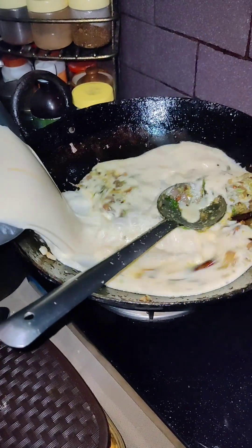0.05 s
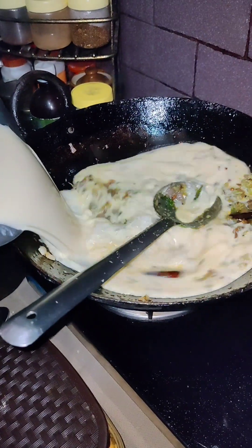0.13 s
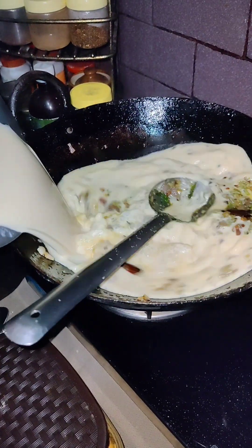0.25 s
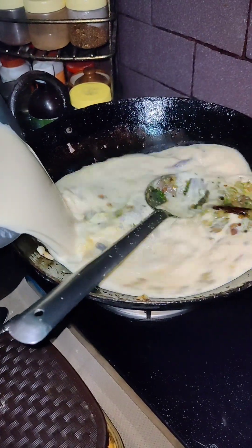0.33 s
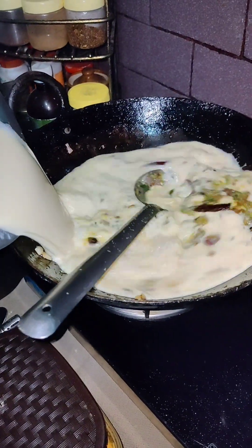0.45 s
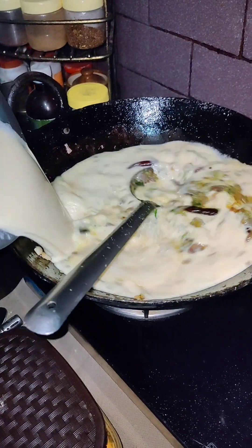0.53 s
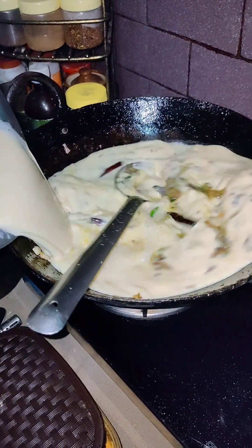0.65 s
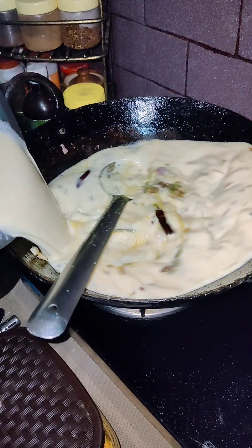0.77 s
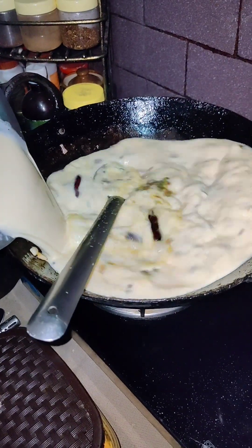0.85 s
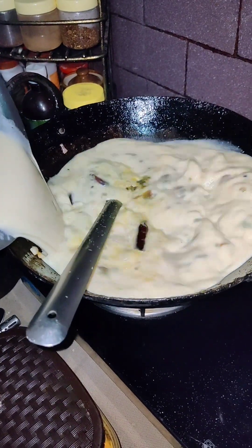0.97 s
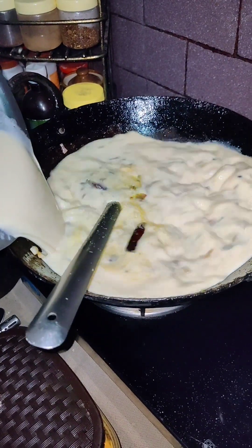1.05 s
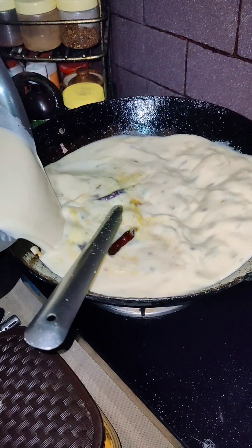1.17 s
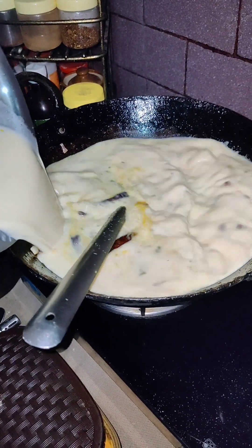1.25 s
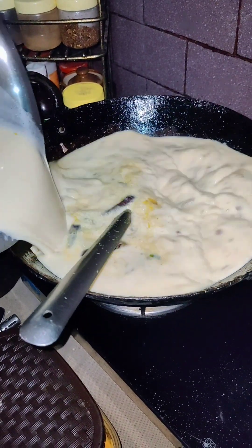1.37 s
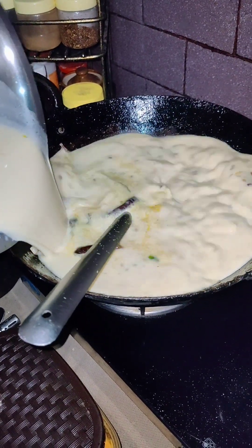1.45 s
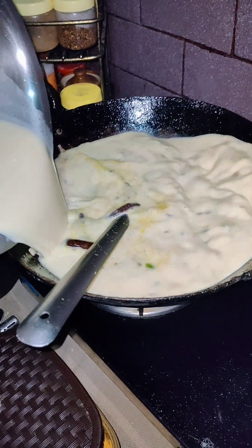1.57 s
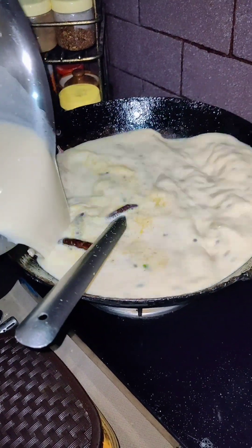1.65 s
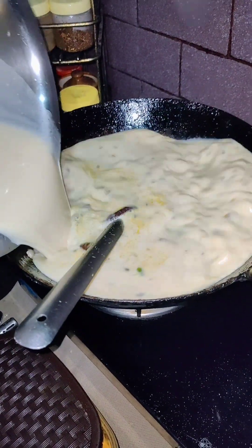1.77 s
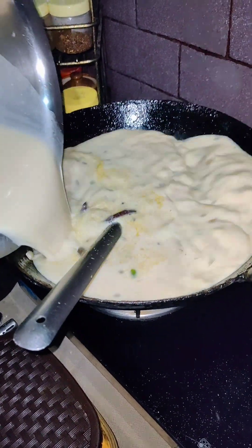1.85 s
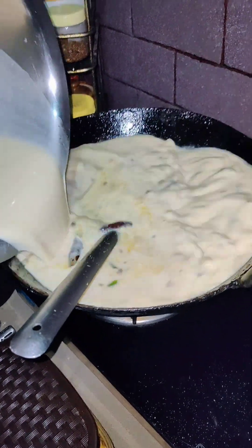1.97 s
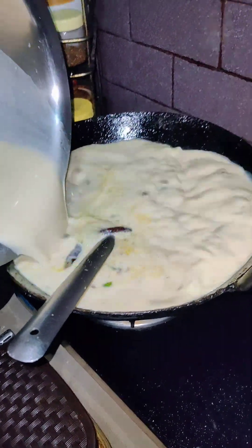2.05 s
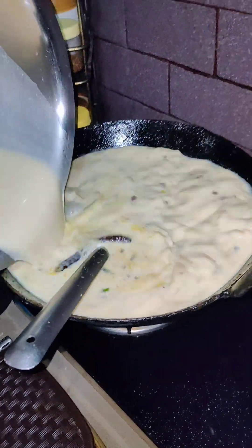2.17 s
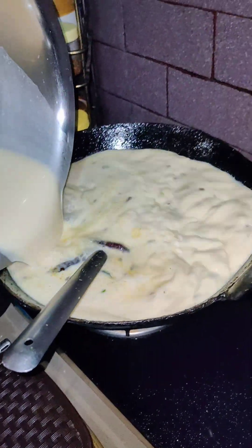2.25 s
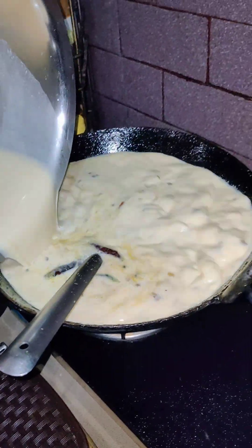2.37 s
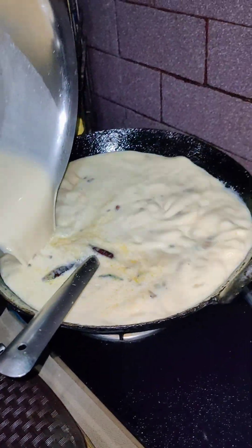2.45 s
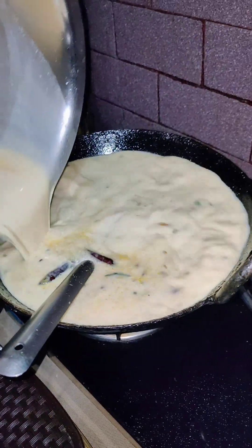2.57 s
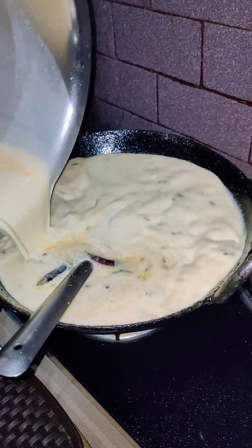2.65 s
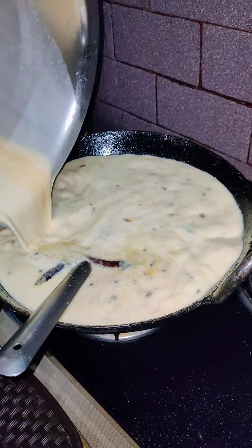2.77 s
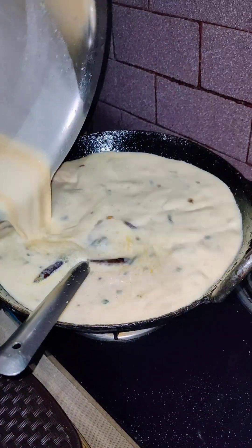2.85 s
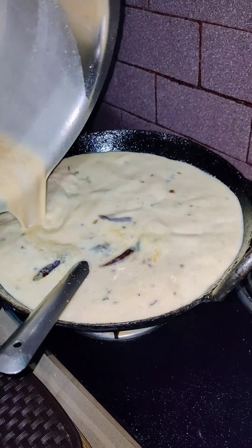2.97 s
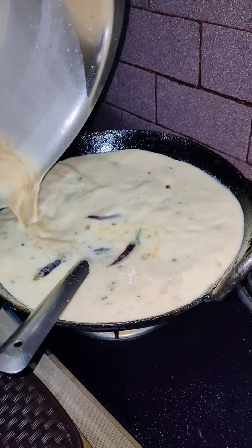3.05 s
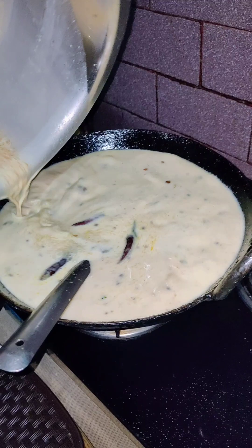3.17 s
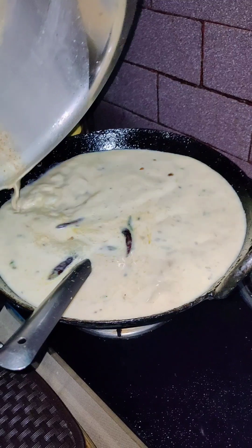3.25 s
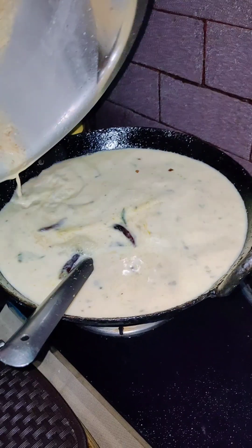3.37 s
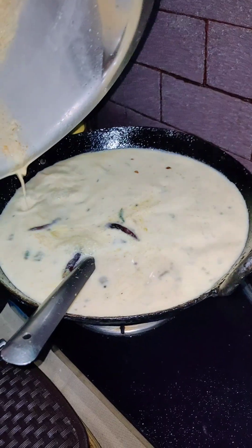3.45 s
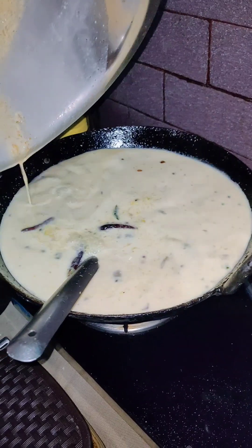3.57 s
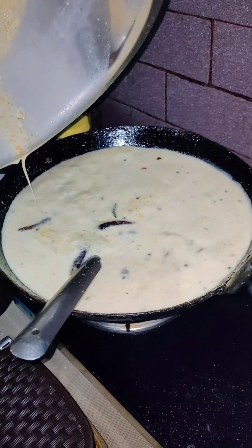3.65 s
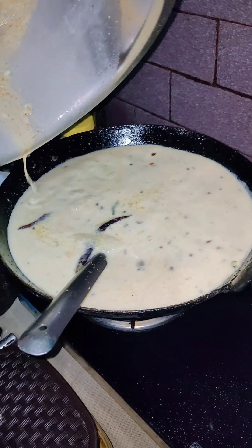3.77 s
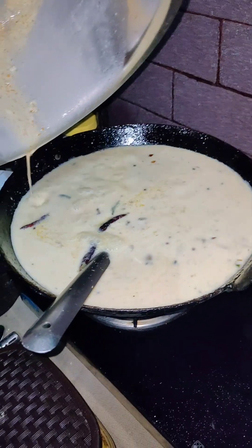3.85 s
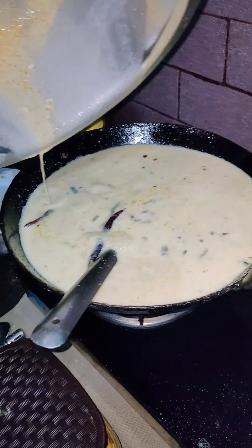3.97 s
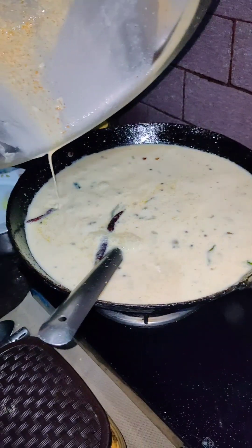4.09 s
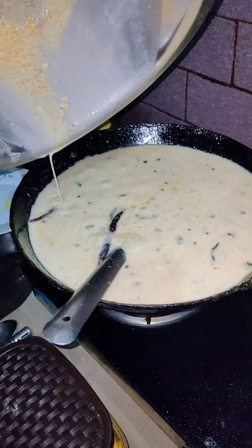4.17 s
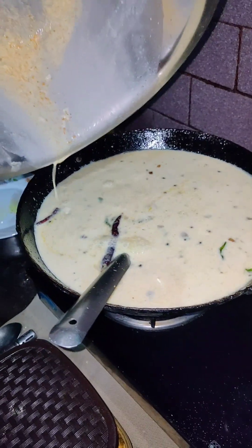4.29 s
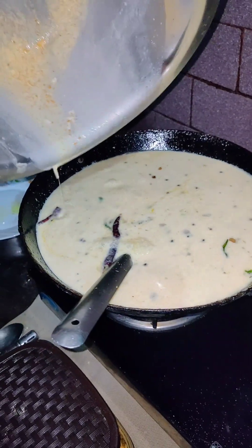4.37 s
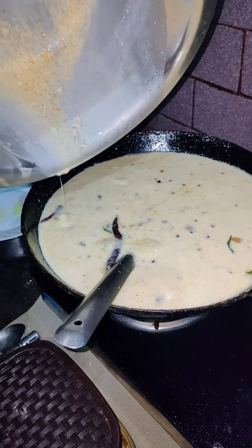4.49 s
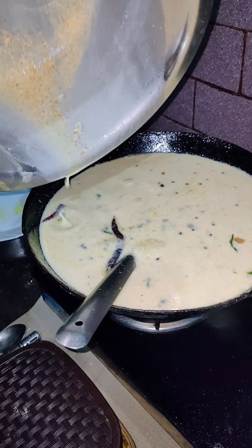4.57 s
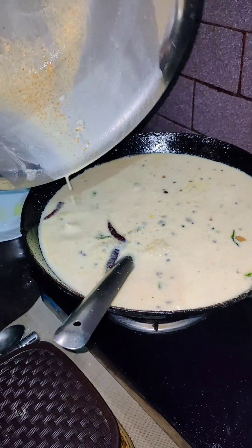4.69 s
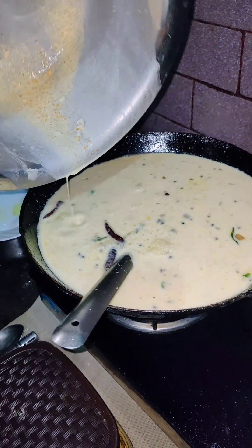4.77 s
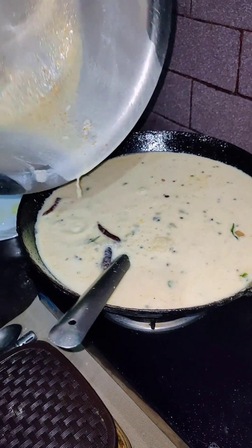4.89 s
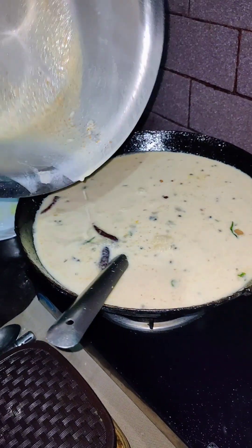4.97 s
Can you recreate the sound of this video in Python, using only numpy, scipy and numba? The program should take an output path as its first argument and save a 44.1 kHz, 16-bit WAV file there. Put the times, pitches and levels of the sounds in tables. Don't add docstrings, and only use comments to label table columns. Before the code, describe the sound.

Liquid batter is poured into a hot deep pan: a loud, dense wet sizzle with low bubbling glugs, softening steadily over three seconds. Soft metal knocks of ladle and pan occur midway, then a brief cluster of plops, and finally thin high fizz with ticking drops. Small tiled kitchen with a faint motor hum, close phone stereo.

```python
import sys
import numpy as np
from scipy import signal
from scipy.fft import rfft, irfft, next_fast_len
from scipy.io import wavfile
from scipy.ndimage import uniform_filter1d, map_coordinates
from numba import njit

SR = 44100
rng = np.random.default_rng(int(sys.argv[2]) if len(sys.argv) > 2 else 0)


def undo_db(level):
    steps = np.asarray(level, float) / 20
    return 10 ** steps


def materialize(psi):
    bounded = np.clip(np.atleast_2d(psi).T, -1, 1)
    quanta = np.round(bounded * 32767).astype(np.int16)
    wavfile.write(sys.argv[1], SR, quanta)


N = 221838
TIME = np.arange(N) / SR

# (time [s], pitch [Hz])
LARGEST = [(0, 696), (.22, 668), (.4, 530), (.9, 427), (1.35, 567), (1.7, 640), (2.3, 728), (2.45, 900),
           (2.62, 1000), (2.9, 1100), (3.0, 1920), (3.09, 1440), (3.16, 1950), (3.3, 2350), (3.45, 1480),
           (3.7, 1690), (3.85, 2250), (5.03, 2420)]
# (time [s], share [0-1])
OVERHANG = [
    (2.6, 0),
    (3.7, 1),
]


def unit(x):
    return x / np.sqrt(np.mean(x ** 2) + 1e-20)


def along(points, hz):
    f, v = np.transpose(points)
    return np.interp(np.log(hz + 1), np.log(f + 1), v)


def over_time(points, t=TIME):
    return np.interp(t, *np.transpose(points))


def wobble(rate):
    knots = rng.standard_normal(int(N * rate / SR) + 4)
    return map_coordinates(knots, [np.arange(N) * rate / SR])


def filtered(x, response):
    m = next_fast_len(N + SR // 2)
    return irfft(rfft(x, m) * response(np.fft.rfftfreq(m, 1 / SR)), m)[..., :N]


@njit
def bursts(n, start, turn, decay, size, lag, pan, rise, swell):
    out = np.zeros((2, n))
    for i in range(len(start)):
        z, step, soft = size[i] + 0j, np.exp(1j * turn[i] - decay[i]), 1.0
        steps = int(5 / decay[i])
        glide = np.exp(1j * rise * turn[i] / steps)
        onset = np.exp(-turn[i] / swell)
        for k in range(steps):
            z, step, soft = z * step, step * glide, soft * onset
            value = z.imag * (1 - soft) * (1 - (k / steps) ** 2)
            a, b = start[i] + k + lag[i], start[i] + k
            if 0 <= a < n:
                out[0, a] += value * pan[i]
            if 0 <= b < n:
                out[1, b] += value / pan[i]
    return out


def sound(s, hz, t60, size, wide, rise, swell=4.1, late=7):
    place = rng.standard_normal((len(s), 2))
    lag = np.round(late + 2.6 * wide * place[:, 0]).astype(int)
    side = undo_db(3.4 * wide * place[:, 1])
    start = np.round(s * SR).astype(int)
    turn, decay = 2 * np.pi * hz / SR, np.log(1000) / (t60 * SR)
    return bursts(N, start, turn, decay, size, lag, side, rise, swell)


def background():
    # (frequency [Hz], density [dB per Hz])
    air = [(15, 4), (30, -7), (50, -3), (100, -1), (150, -1), (220, -11.5), (314, -15.5), (390, -11),
           (600, -18.5), (1110, -24), (2000, -26.5), (4000, -55)]
    # (frequency [Hz], width [Hz], level [dB rms], pure tone over unsteady part [ratio])
    hum = [(48.6, 6, -59, 3), (76, 9, -65, .4), (110, 10, -67, .2), (148.6, 6, -65.5, 2),
           (255, 14, -83, .2), (390, 12, -85, .2)]
    air_mix = np.array([[1, 1.0], [1, -0.26]])
    hum_mix = np.array([[1, 0.78], [1, -0.24]])
    breath = filtered(air_mix @ rng.standard_normal((2, N)), lambda f: undo_db(along(air, f)))
    x = undo_db(-65.0) * unit(breath)
    for hz, width, db, purity in hum:
        line = lambda f: np.exp(-((f - hz) / width) ** 2)
        drift = filtered(hum_mix @ rng.standard_normal((2, N)), line)
        steady = purity * np.sin(2 * np.pi * hz * TIME)
        x = x + undo_db(db) * unit(steady + unit(drift))
    return x


def kitchen(x):
    # (frequency [Hz], t60 [s])
    room_decay = [(300, .22), (2000, .2), (12000, .12)]
    hop = 4096
    count = N // hop + 3
    hz, t, z = signal.stft(rng.standard_normal((2, count, SR // 4)), SR, nperseg=256)
    fall = undo_db(-60 * t / along(room_decay, hz)[:, None])
    right, other = signal.istft(z * fall, SR, nperseg=256)[1]
    tail = np.array([.7 * right + .71 * other, right])
    tail = tail / np.linalg.norm(tail, axis=2)[..., None]
    padded = np.pad(x, ((0, 0), (hop + 200, 4 * hop)))
    out = np.zeros((2, padded.shape[1] + 2 * SR))
    fade = np.sqrt(2 / 1.5) * np.hanning(2 * hop)
    for k in range(count):
        piece = padded[:, k * hop:(k + 2) * hop] * fade
        echo = signal.fftconvolve(piece, tail[:, k], axes=1)
        out[:, k * hop:k * hop + echo.shape[1]] += echo
    return out[:, hop:hop + N]


def strays():
    u = rng.random((150, 4))
    hz = 800 * 2 ** (1.3 * u[:, 1])
    s = 2.3 + 2.7 * u[:, 0]
    fade_db = 9 * np.clip(s - 3.4, 0, 1)
    size = undo_db(-70 - fade_db + 10 * (u[:, 3] - .5))
    return sound(s, hz, (40 + 80 * u[:, 2]) / hz, size, wide=.6, rise=.05, swell=12)


def knocks():
    # (time [s], bowl [dB], pan [dB], ladle [dB])
    touches = [
        (1.172, -49, -53, -44),
        (1.187, -78, -54, -64),
        (1.216, -58, -64, -80),
        (2.499, -51.5, -42, -75),
        (2.5148, -62, -36.5, -72),
        (2.566, -67.5, -58, -90),
        (2.591, -80, -58, -90),
        (3.3, -80, -69, -69),
        (5.0125, -84.5, -80, -63),
        (5.02, -76, -75, -46.5),
    ]
    # (frequency [Hz], level [dB], t60 [s])
    bowl = [(227, 10, 0.067), (272, -22, 0.048), (460, -24, 0.047)]
    # (frequency [Hz], level [dB], t60 [s])
    bottom = [(359, 5.5, 0.12), (290, 0.5, 0.15), (504, -14.5, 0.11), (640, -22, 0.079), (706, -8, 0.073)]
    # (frequency [Hz], level [dB], t60 [s])
    ladle = [(640, -3, 0.13), (858, -1, 0.21), (1250, -5, .05), (982, -4, 0.13), (1560, 8, 0.033),
             (2060, 0, 0.079), (2560, -5, 0.057)]
    rows = []
    for s, *hit in touches:
        for level, body in zip(hit, (bowl, bottom, ladle)):
            rows += [(s, hz, t60, level + db) for hz, db, t60 in body]
    s, hz, t60, db = np.transpose(rows)
    late = np.where(hz < 600, 8, 1)
    return sound(s, hz, t60, undo_db(db), wide=.05, rise=.08, swell=18, late=late)


def spits():
    # (time [s], peak [dB], tilt [dB per octave])
    fat = [(.0544, -33, 0), (.305, -38, 1), (.8185, -38, 1), (1.224, -41, 1), (1.259, -39, 1),
           (1.462, -41, 1), (1.5155, -39, 1), (1.9185, -39, 1), (2.022, -44, 1), (2.196, -47, 1),
           (2.3755, -46, 1), (2.462, -48, 1), (2.923, -49, 1), (3.157, -52, 0), (3.338, -43, 0),
           (3.342, -49, -1), (3.405, -50, 0), (3.4444, -48, 1), (3.452, -49, 2), (4.18, -45, -1),
           (4.4216, -47, -1), (4.589, -44, -2), (4.6914, -46, -1), (4.709, -45, 0)]
    s, db, tilt_db = np.repeat(fat, 16, axis=0).T
    u = rng.random((len(s), 2))
    hz = 2500 + 12500 * u[:, 1]
    size = undo_db(db - 6 + tilt_db * np.log2(hz / 5000))
    return sound(s + .005 * u[:, 0] ** 2, hz, .003 + 0 * s, size, wide=.3, rise=.01)


def plops():
    # (time [s], peak [dB], pitch
    # [Hz], t60 [s])
    singles = [(1.441, -30, 1507, .06), (1.9, -33, 1437, 0.079), (2.17, -38, 1290, .07),
               (2.51, -41, 1010, 0.044), (2.512, -37, 1800, 0.042), (2.62, -56, 720, .1),
               (2.885, -51, 1190, .04), (2.55, -48, 760, .08), (2.72, -58.5, 730, 0.085),
               (2.84, -58, 815, 0.065), (3.005, -63, 860, 0.046), (3.2, -67, 1232, 0.13),
               (3.305, -58, 410, 0.079), (3.295, -56, 626, 0.073), (3.313, -50, 640, .06),
               (3.368, -62, 1224, 0.17), (3.385, -58, 1220, .08), (3.408, -55, 1290, .05),
               (3.441, -48.5, 1220, .12), (3.442, -55, 1570, .06), (3.452, -58, 1700, 0.04),
               (3.448, -55, 785, 0.06), (3.462, -48.5, 798, .12), (3.49, -56, 1736, .08),
               (3.503, -55, 1204, .12), (3.506, -39.5, 793, 0.078), (3.521, -50, 813, 0.086),
               (3.548, -62, 1500, .11), (3.59, -63, 863, .15), (3.6, -58, 1463, 0.088),
               (3.625, -59, 1520, 0.072), (3.639, -50.5, 1204, 0.13), (3.665, -55, 1170, .1),
               (3.655, -56, 1500, 0.071), (3.69, -61, 1185, 0.078), (3.71, -66, 1530, 0.11),
               (3.755, -68, 1910, 0.12), (3.818, -60, 1990, 0.11), (3.815, -64, 1250, 0.091),
               (3.95, -60, 590, 0.056), (3.978, -66, 1710, .05), (4.003, -67, 960, 0.056),
                  (4.07, -70, 1560, .07), (4.112, -68, 2060, .07), (4.18, -63, 1610, .05),
                  (4.203, -69, 1230, 0.15), (4.211, -55, 1950, .06), (4.242, -59, 2030, .05),
                  (4.325, -58, 1500, .05), (4.389, -70, 1930, .07), (4.452, -66, 1660, 0.089),
                  (4.541, -65, 1930, .06), (4.563, -65, 2000, .06), (4.591, -58.5, 1674, 0.096),
                  (4.59, -56, 1970, 0.057), (4.698, -65, 1450, 0.062), (4.723, -65, 1990, .15),
                  (4.776, -66.5, 2030, .1), (4.83, -64, 1270, .06), (5.012, -47, 842, 0.15)]
    # (time [s], peak [dB], pitch [Hz], t60 [s])
    rim_ticks = [(3.3, -48, 2580, .04), (3.345, -58, 2730, .06), (3.357, -50, 2760, .05),
                 (3.358, -54, 3620, 0.16), (3.376, -44, 2470, 0.043), (3.38, -47, 2790, 0.047),
                 (3.391, -46, 2440, .04), (3.395, -63, 3050, .05), (3.415, -63, 2480, .08),
                 (3.545, -54, 2280, .05), (3.58, -55.5, 2200, .1), (3.64, -49, 3600, 0.063),
                 (3.681, -46, 2750, .05), (3.885, -62, 3100, .06), (3.928, -53, 2400, 0.076),
                 (3.978, -53, 2510, .05), (4.029, -55, 2280, .1), (4.061, -52, 2440, 0.081),
                 (4.065, -44.5, 3000, 0.045), (4.099, -50, 2500, 0.051), (4.177, -48.5, 3340, 0.073),
                 (4.176, -47, 4240, .04), (4.028, -53, 2460, 0.042), (4.318, -45, 4450, .04),
                 (4.345, -53, 3550, .06), (4.22, -48, 3260, 0.037), (4.285, -43, 2370, 0.055),
                 (4.325, -48, 2290, 0.048), (4.455, -58, 2320, .05), (4.561, -56, 2620, .04),
                 (4.589, -53, 2500, .07), (4.63, -53, 2520, .1), (4.69, -52.5, 2310, 0.07),
                 (4.705, -49, 2470, 0.06), (4.776, -57, 3100, 0.14), (4.803, -52.5, 2310, .08)]
    # (time [s], peak [dB], pitch [Hz], t60 [s])
    glugs = [(0.319, -29.5, 1260, .06), (.32, -33, 2360, 0.045), (.35, -26, 996, 0.031),
             (.39, -30.5, 770, 0.068), (.395, -27, 960, 0.052), (0.421, -28, 1270, 0.035),
             (.475, -32, 987, 0.066), (0.481, -30, 1255, 0.052), (.5, -27.5, 813, 0.058),
             (.56, -35, 2184, 0.053), (.61, -27.5, 1300, 0.042), (0.738, -32.5, 1220, 0.072),
             (1.076, -26.5, 1330, 0.04), (1.339, -47, 1200, .05), (1.882, -28.5, 1384, 0.044),
             (1.981, -28, 1500, 0.026), (2.149, -35.5, 1240, 0.055), (2.396, -38, 1590, 0.034)]
    ticks = [(s, db - 5.0, hz, 1.4 * t60) for s, db, hz, t60 in rim_ticks]
    rows = singles + ticks + glugs
    s, db, hz, t60 = np.transpose(rows)
    first = sound(s, hz, .65 * t60, undo_db(db + 5), wide=.15, rise=.02, swell=20, late=2)
    s, db, hz, t60 = np.repeat(rows, 4, axis=0).T
    u = rng.random((len(s), 2))
    later = (np.arange(len(s)) % 4 + u[:, 0]) / 4
    near_hz = hz * (.96 + .08 * u[:, 1])
    size = undo_db(db - 1.5 - 9 * later)
    return first + sound(s + .4 * t60 * later, near_hz, .5 * t60, size, wide=.3, rise=.02, swell=30, late=3)


def leaning(f):
    # (frequency [Hz], left minus right [dB])
    lean = [(900, -3), (1500, -1.5), (2400, 3.5), (6500, 2.5), (9000, -8), (11500, 5), (13500, 1.5)]
    return undo_db(np.outer([.5, -.5], along(lean, f)))


def froth(count, low_hz, high_hz, cycles, scatter_db):
    # (frequency [Hz], density [dB per Hz])
    sizzle = [(260, -31), (450, -11), (597, -7.5), (703, -1), (816, -6), (976, -5), (1080, -7.5),
              (1280, -6.5), (1640, -5), (2310, -1), (4390, -11), (6180, -9), (8840, -23.5), (13000, -31),
              (15800, -25)]
    u = rng.random((count, 3))
    s = u[:, 0] * (N / SR + .05) - .05
    hz = low_hz * (high_hz / low_hz) ** u[:, 1]
    allowed = 1 / np.sqrt(1 + (over_time(LARGEST, s) / hz) ** 14)
    size = hz * undo_db(along(sizzle, hz) + scatter_db * rng.standard_normal(count)) * allowed
    crowd = sound(s, hz, cycles * (.5 + u[:, 2]) / hz, size, wide=1.01, rise=0.12)
    power = uniform_filter1d(np.mean(crowd ** 2, axis=0), SR // 10)
    return crowd / np.sqrt(np.abs(power) + 1e-20)


def crowd_db(fineness, over_db, follows, under_bowl_db):
    # (time [s], level [dB])
    boil_heat = [(0, -39.5), (.9, -44.5), (1.4, -49), (1.9, -47.5), (2.05, -48), (2.6, -52), (2.8, -58.5),
                 (3.3, -58), (3.55, -63.5), (4.0, -58), (4.3, -57.5), (4.75, -62.5), (5.03, -64)]
    # (time [s], level [dB], length [s], fineness of bubbles [0-1])
    surges = [(0.064, 4, 0.037, 1), (0.223, -3.5, 0.22, 1), (0.326, 0, 0.05, .1), (0.427, 4, 0.051, 0.33),
              (0.46, 4.5, 1, 0.31), (0.492, 3, 0.1, 0.38), (0.59, 4.5, 0.15, 0.94), (0.813, 4.5, 0.2, 0.87),
              (1.08, 5.5, 0.31, 0.83), (1.316, 8, 0.28, 0.88), (1.43, -6, 0.12, 1), (1.474, 4.5, 0.5, 0),
              (1.558, 9.5, 0.3, 0.88), (1.772, 6, 0.22, 0.91), (1.91, 1, 0.3, 0), (1.917, 7, 0.11, 0.93),
              (2.074, 5, 0.055, 1), (2.172, 0.5, 0.14, 0), (2.66, 8.5, 0.06, 0.25), (2.94, 4, 0.041, 0.88),
              (3.273, -21, 0.47, 1.08), (3.368, 4, 0.019, 0.7), (3.456, 14, 0.18, 1),
              (3.675, 7.5, 0.21, 0.73), (3.842, 22, 0.055, 0.16), (3.957, -4.5, 0.26, 0.72),
              (4.02, -4, 0.074, 0.7), (3.31, -4.5, 0.044, 0.6), (4.06, 8, 0.054, 0.1),
              (4.153, -8, 0.046, 0.26), (4.268, -0.5, .04, .4), (4.5, 1.5, .1, 0.5),
              (4.174, 6.5, 0.04, 0.8), (4.302, -3, 0.047, 0.3), (4.592, 5.5, 0.032, 0.55),
              (4.7, 4, 0.063, 0.8), (4.864, 3.5, 0.073, 0.7), (4.932, -4.5, 0.3, 1)]
    reach = 0.32
    heat = over_time(boil_heat)
    swell = 0
    for s, db, length, fine in surges:
        swell = swell + db * np.exp(-((fine - fineness) / reach) ** 2 - 6 * ((TIME - s) / length) ** 2)
    return heat[0] + over_db + follows * (heat - heat[0]) + swell + under_bowl_db * over_time(OVERHANG)


def smothered(x, patchy_db):
    hz, t, z = signal.stft(x, SR, nperseg=1024)
    ragged = 2 ** (.1 * np.interp(t, TIME, wobble(14)))
    edge = 0.83 * ragged * over_time(LARGEST, t)
    patches = uniform_filter1d(rng.standard_normal(z.shape[1:]), size=4, axis=0)
    patches = uniform_filter1d(patches, size=5, axis=1)
    sparse = 1 + 2.6 * over_time(OVERHANG, t)
    gain = undo_db(patchy_db * sparse * unit(patches)) / (1 + (edge / (hz[:, None] + 1)) ** 13)
    return signal.istft(z * gain, SR, nperseg=1024)[1][:, :N]


def boil():
    # (frequency [Hz], width [Hz], level [dB])
    pan_wall = [(774, 23, -6.5), (860, 10, -0.5), (987, 79, 1.5), (1255, 220, 6), (1428, 130, 1),
                (2030, 74, -9), (2837, 17, -6), (2340, 242, 1.5), (6230, 430, -3), (12800, 950, 3)]
    # (frequency [Hz], width [Hz], share cancelled + or reinforced - [ratio])
    shadow = [(1800, 140, 0.22), (2125, 190, 1), (2400, 490, -0.32), (2950, 350, 0.92), (3260, 250, 0.44),
              (3860, 120, 0.56), (5870, 110, 0.33), (5940, 370, -0.51)]
    # (time [s], level [dB], length [s])
    lulls = [
        (3.98, -7, .28),
        (4.3, -2, 0.053),
        (4.45, -2.5, 0.18),
        (4.63, -2, 0.13),
        (4.76, -1, .08),
        (4.934, -3.5, 0.37),
        (3.25, -1, 0.22),
    ]
    octaves = np.log2(over_time(LARGEST) / 500)
    thins_db = 6
    large = crowd_db(0.0086, over_db=5.0, follows=0.89, under_bowl_db=-6.0) - thins_db * octaves
    rim = crowd_db(0.58, over_db=-2.0, follows=0.59, under_bowl_db=-8.5)
    middle = crowd_db(0.64, over_db=-1.0, follows=0.62, under_bowl_db=-3.0)
    small = crowd_db(0.68, over_db=-1.9, follows=0.83, under_bowl_db=-0.2)
    spray = crowd_db(0.93, over_db=-4.5, follows=0.95, under_bowl_db=-0.5)
    for s, db, length in lulls:
        middle = middle + db * np.exp(-6 * ((TIME - s) / length) ** 2)

    surge = 0.28 * wobble(16) + .5 * wobble(29.95)
    spray = spray + 0.15 + 0.5 * surge + 0.6 * wobble(25.48)
    x = undo_db(large - 2.5 + surge) * froth(24000, 371.3, 2033, cycles=20.6, scatter_db=0.5)
    x = x + undo_db(rim + surge) * froth(10000, 1960, 2740, cycles=10.4, scatter_db=-1.0)
    x = x + undo_db(middle + 0.77 + surge) * froth(12000, 2702, 4343, cycles=38, scatter_db=1)
    x = x + undo_db(small + 1.1 + 0.27 * surge) * froth(24000, 4280, 8240, cycles=34.4, scatter_db=0.0)
    x = x + undo_db(spray) * froth(40000, 7660, 15600, cycles=3.8, scatter_db=-2.0)

    peak = lambda f, c, w: 1j * f * w / (c * c - f * f + 1j * f * w)
    wall = lambda f: 1 + undo_db(-4.5) * sum(undo_db(db) * peak(f, c, w) for c, w, db in pan_wall)
    notches = lambda f: np.prod([1 - np.clip(d, -2, 1) * peak(f, c, w) for c, w, d in shadow], axis=0)
    x = filtered(x, wall)
    shaded = filtered(x, lambda f: leaning(f) * notches(f))
    over = np.clip(over_time(OVERHANG), 0, 1)
    return smothered((1 - over) * x + over * shaded, patchy_db=.6)


def scene():
    pan = undo_db(-1.5) * boil() + strays()
    near = filtered(plops(), leaning) + spits() + knocks()
    echo = undo_db(-5.5) * kitchen(pan + undo_db(-0.5) * near)
    return pan + near + echo + background()


def roll_off(x):
    return signal.sosfilt(signal.butter(12, 15850, fs=SR, output="sos"), x)


def record(dry):
    # (frequency [Hz], left minus right [dB])
    port_tilt = [(40, -7.5), (150, -6), (380, -3.5), (700, -4), (1300, -.5), (2400, 1.6), (6000, 1),
                 (9500, -1), (14000, 5.5)]
    response = lambda f: undo_db(np.outer([.5, -.5], along(port_tilt, f))) * (f < 15750)
    return roll_off(filtered(dry, response))


dry = scene()
out = record(dry)
materialize(out)
```